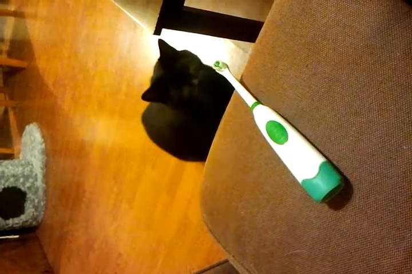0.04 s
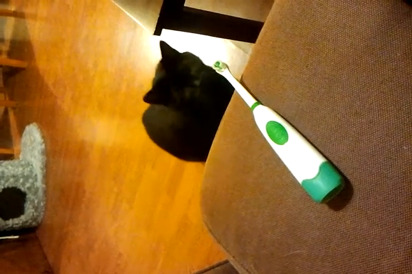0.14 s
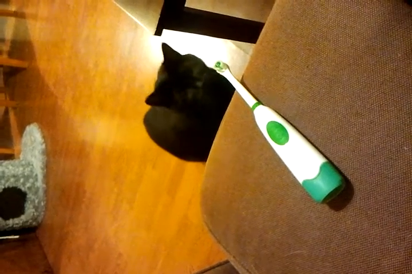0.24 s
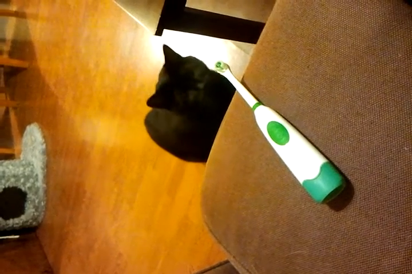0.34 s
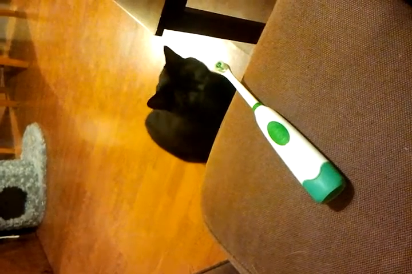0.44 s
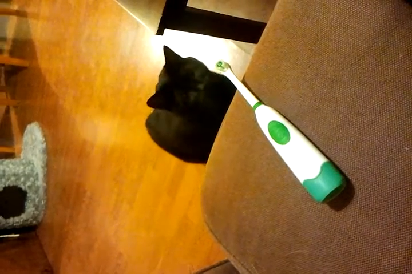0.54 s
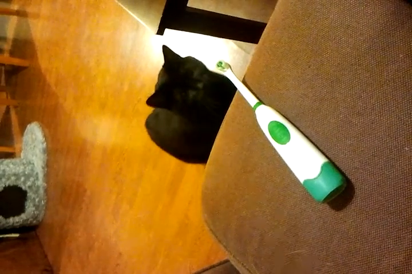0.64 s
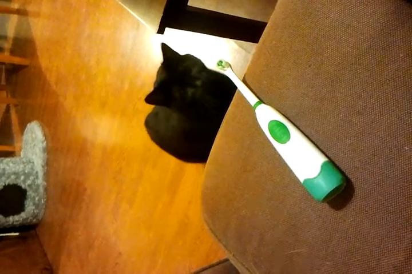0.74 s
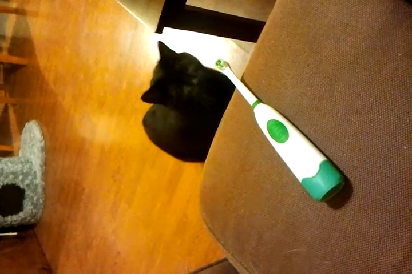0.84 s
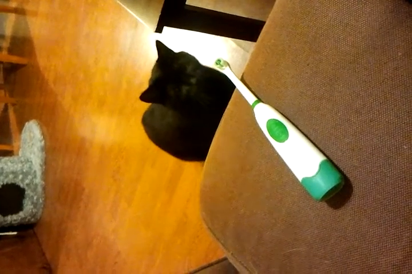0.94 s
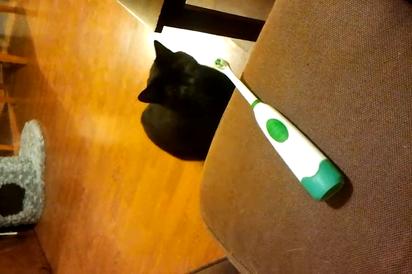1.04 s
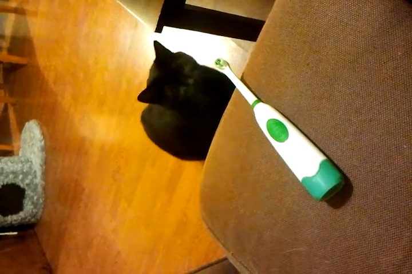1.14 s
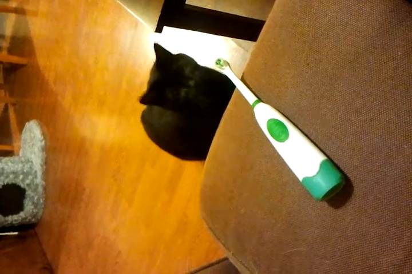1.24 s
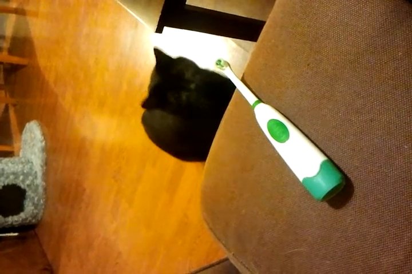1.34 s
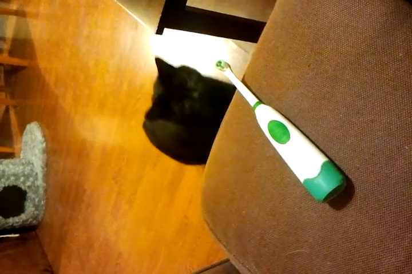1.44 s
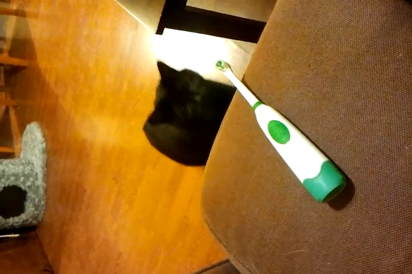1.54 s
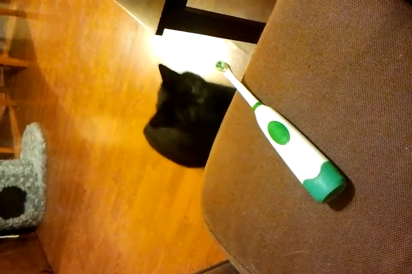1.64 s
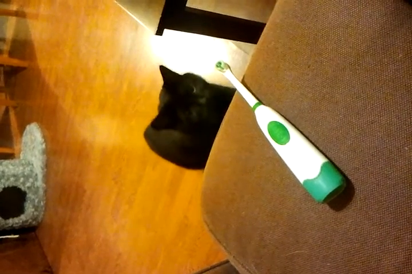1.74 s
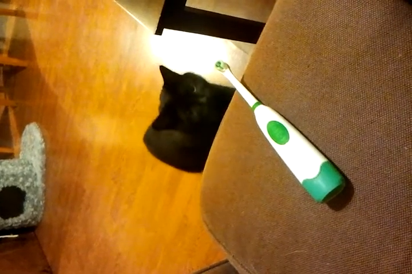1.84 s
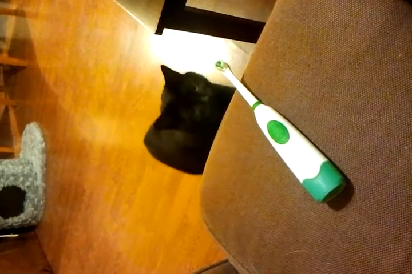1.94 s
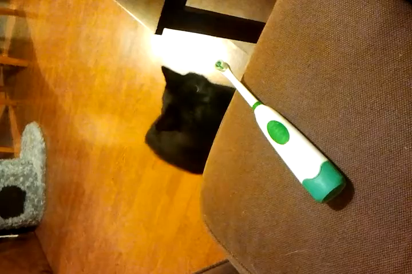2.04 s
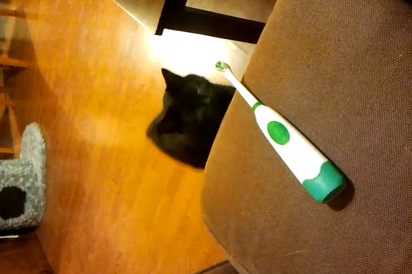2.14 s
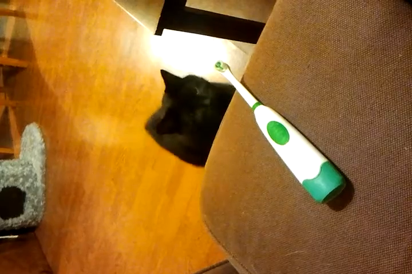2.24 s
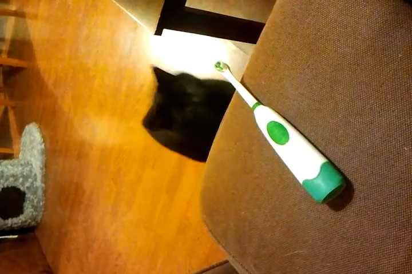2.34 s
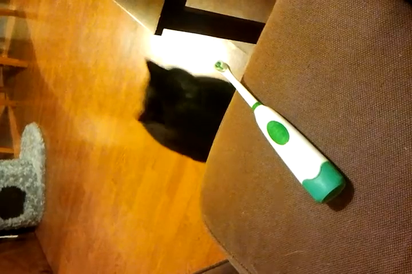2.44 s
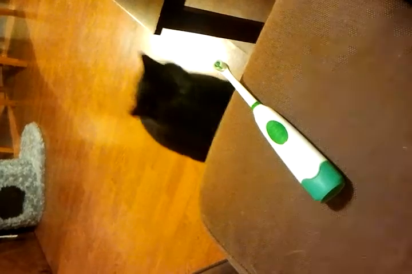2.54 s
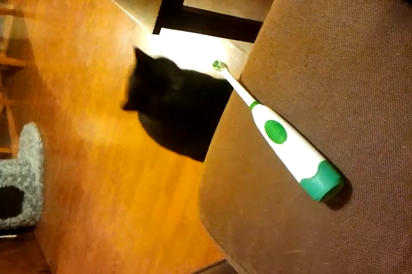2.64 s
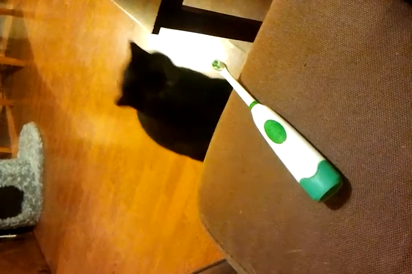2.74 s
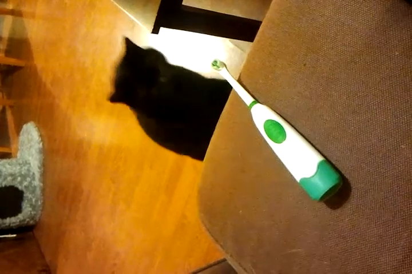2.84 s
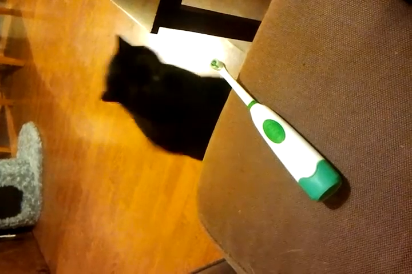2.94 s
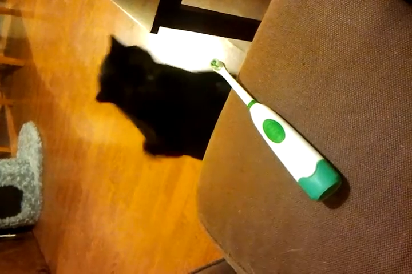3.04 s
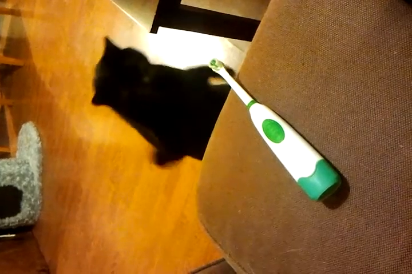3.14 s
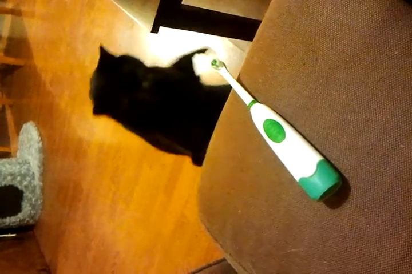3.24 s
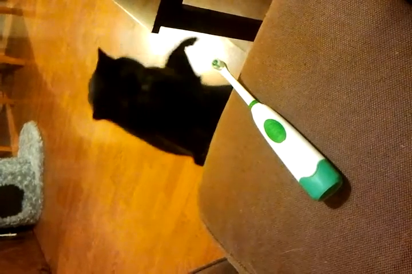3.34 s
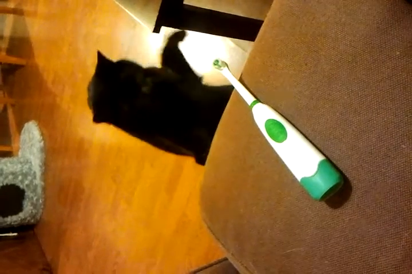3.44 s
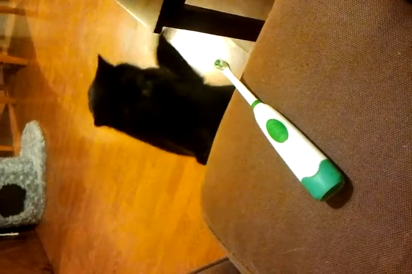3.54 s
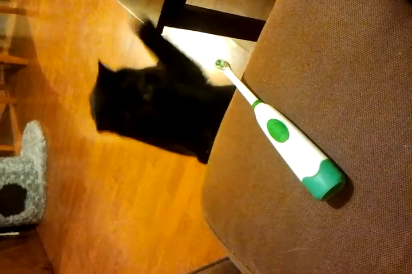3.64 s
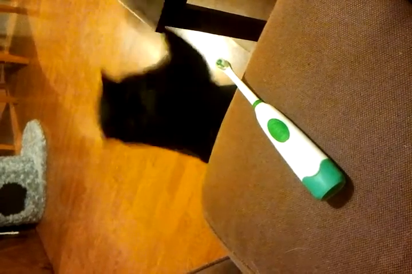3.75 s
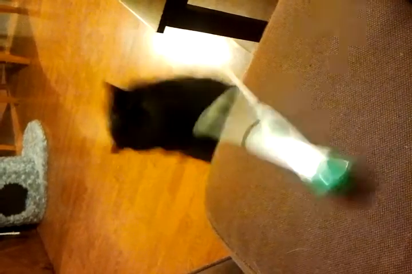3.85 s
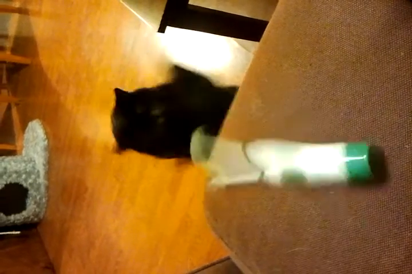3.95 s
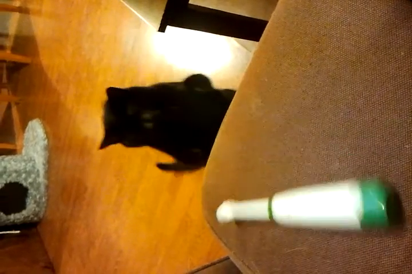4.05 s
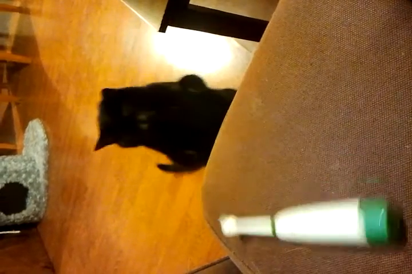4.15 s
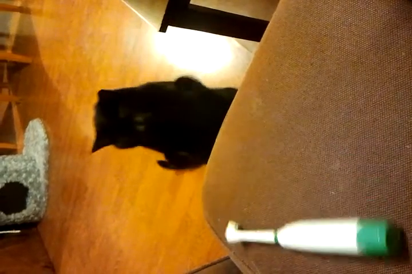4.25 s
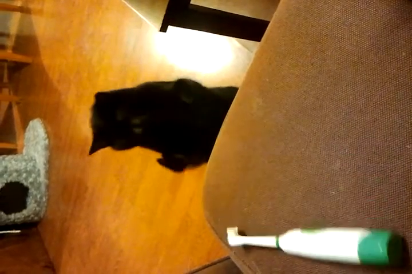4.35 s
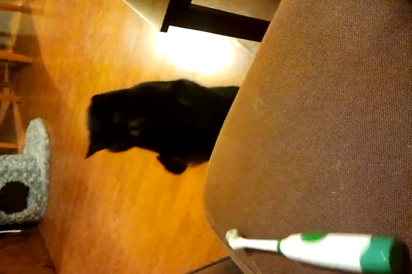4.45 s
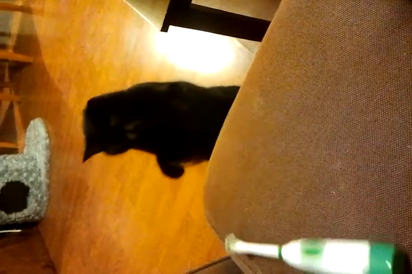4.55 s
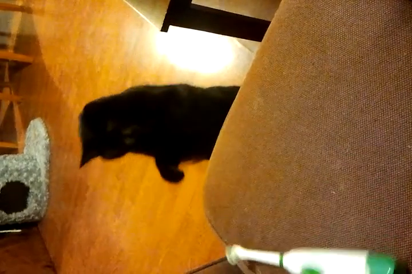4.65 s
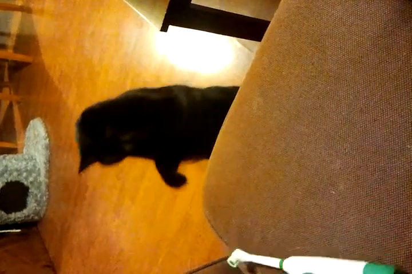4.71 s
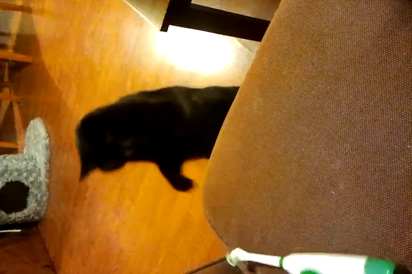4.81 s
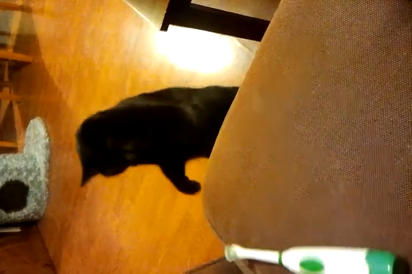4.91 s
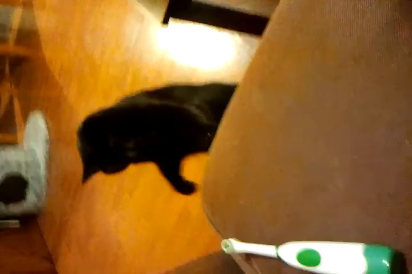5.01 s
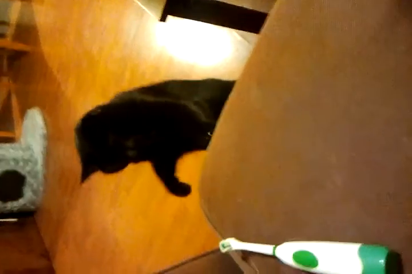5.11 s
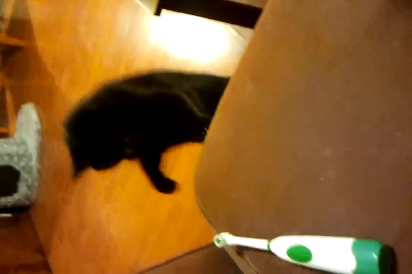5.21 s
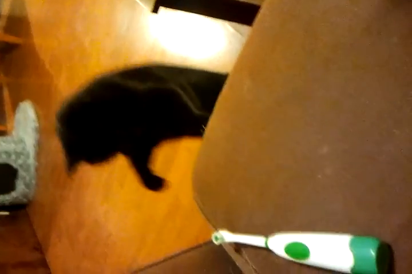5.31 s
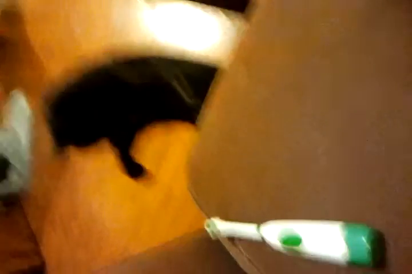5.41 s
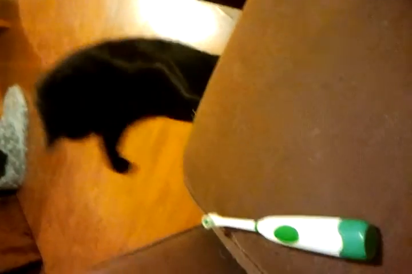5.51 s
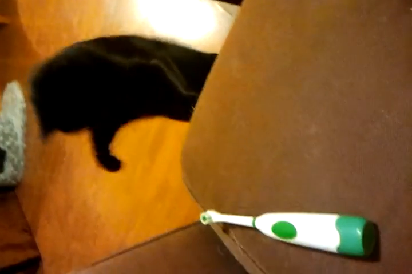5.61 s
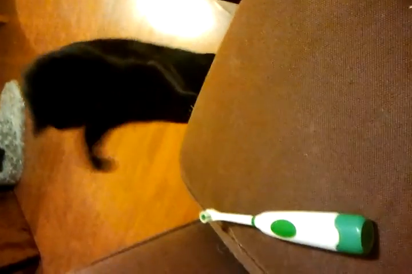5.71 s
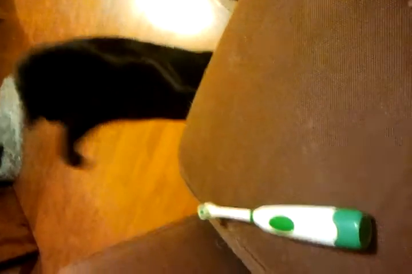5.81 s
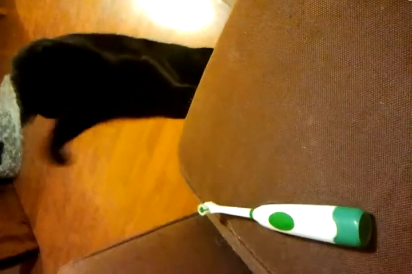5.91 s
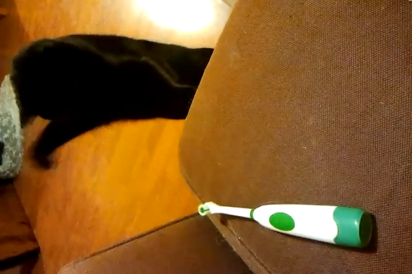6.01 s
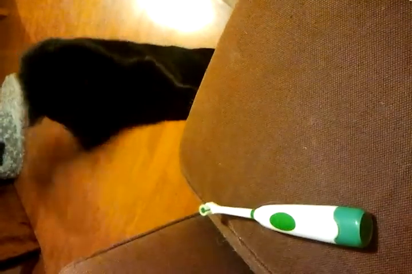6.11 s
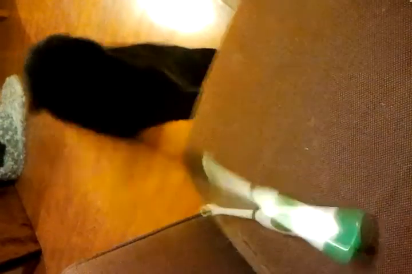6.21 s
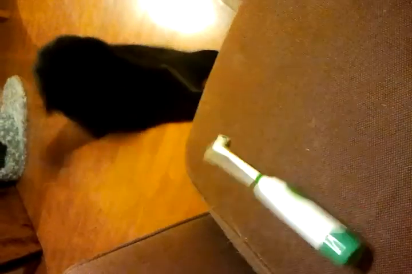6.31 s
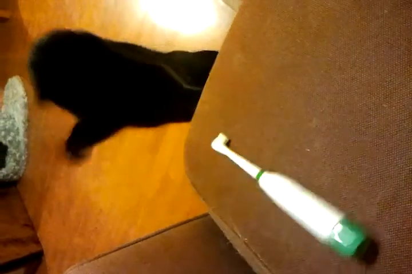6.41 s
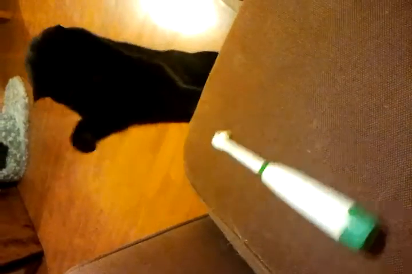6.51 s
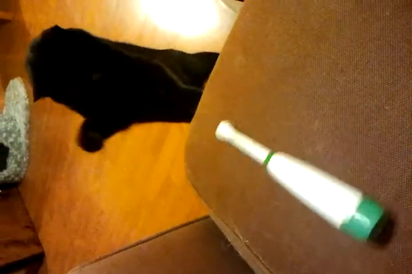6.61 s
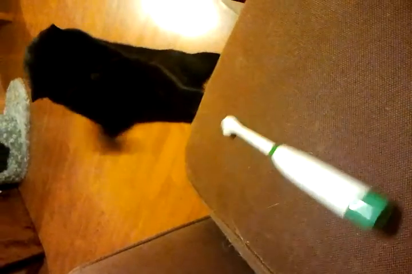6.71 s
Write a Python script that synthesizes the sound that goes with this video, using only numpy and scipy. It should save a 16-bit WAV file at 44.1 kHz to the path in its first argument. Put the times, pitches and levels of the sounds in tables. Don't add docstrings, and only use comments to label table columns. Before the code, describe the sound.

A battery toothbrush buzzes steadily on a padded seat until a cat's paw knocks it, and it rattles, settles, then is batted again.

```python
import sys
import numpy as np
from scipy import signal
from scipy.fft import rfft, irfft
from scipy.io import wavfile
from scipy.ndimage import uniform_filter1d

SR = 44100
rng = np.random.default_rng(int(sys.argv[2]) if len(sys.argv) > 2 else 0)


def to_linear_factor(level_db):
    exponent = np.asarray(level_db, float) / 20
    return 10 ** exponent


def file_out(sig):
    cols = np.atleast_2d(sig).T
    lim = np.clip(cols, -1, 1)
    pcm = np.round(lim * 32767).astype(np.int16)
    wavfile.write(sys.argv[1], SR, pcm)


N = 298557

# t/s, turns per s
SPEED = [(0.0, 95.2), (.09, 95.0), (1.07, 94.9), (1.23, 95.1), (1.39, 94.7), (1.86, 95.2), (1.95, 94.7),
         (2.31, 94.8), (2.44, 94.3), (2.66, 94.8), (2.85, 94.5), (2.93, 94.8), (3.49, 94.25), (3.65, 94.7),
         (3.75, 94.2),
         (3.9, 95.4), (4.25, 94.95), (4.55, 94.9), (4.7, 94.3), (4.8, 95.7), (5.05, 96.4),
                 (5.2, 95.2), (5.4, 94.75), (5.65, 94.5), (6.2, 94.4), (6.4, 94.6), (6.77, 95.6)]


def motor_turns():
    start_turn = .41
    return start_turn + np.cumsum(in_time(SPEED)[0]) / SR


# t/s, pose 0-3 (2 is rolling), looseness 0-1
POSE = [(0, 0, .1), (.4, 0, .1), (.52, 0, .24), (.62, 0, .1), (1.8, 0, .1), (2.08, 1, .1), (3.2, 1, .1),
        (3.3, 1, .2), (3.42, 1, .12), (3.56, 1, .2), (3.75, 1, .14), (3.77, 2, 1), (4.2, 2, .9),
        (4.3, 2, .55), (4.52, 2, .55), (4.64, 2, .75), (4.76, 2, .5), (5.0, 2, .4), (5.12, 3, .12),
        (6.2, 3, .08), (6.22, 2, 1), (6.5, 2, .9), (6.77, 2, .75)]


def lying(s=None):
    return in_time(POSE, s)


# share of turn, handle level/dB, neck level/dB, head level/dB
CONTACTS = [
    [(.05, 1.5, -6.5, -1.5), (.16, 0.5, -1.5, -15.5), (.3, 0.5, -10.5, -2.5), (.47, 7, -5.5, -7.5),
     (.6, -11, -10, -18.5), (.8, -13, -26, -5), (.92, -3, 3.5, 0)],
    [(.01, 2, -3.5, -7), (.11, -13, -20.5, 2.5), (.21, -9, -3.5, -24), (.34, -17, -9, -6),
     (.45, -6, -17, -2.5), (.74, 1.5, -16, -11.5), (.87, -4.5, 5, 2.5)],
    [(.12, -2, -4, -19), (.31, 0, 0, 0), (.44, -3, -3, -16), (.6, -2, -2, -13), (.74, -2, -3, -19),
     (.82, -2, -4, -18), (.89, -1, -2, -10)],
    [(.08, -5, -14.5, -19), (.21, -4, -25, 5), (.36, 3, 7.5, -18), (.51, 1, -16, -5), (.68, 0, -10, -4),
     (.89, -1.5, 10, 0), (.96, -0.5, -6, 4)],
]


def contact_blows(turns, slip=0.02836, scatter_db=1.5):
    wobble_turns = 0.0081
    jump_share = .45
    rebound_from, rebound_to, rebound_db = 4.7, 5.1, 8
    table = np.array(CONTACTS)
    turn = np.arange(660)
    t = np.arange(N) / SR
    pose, loose = lying(np.interp(turn, turns, t))
    share = np.clip(1 - np.abs(pose[:, None] - np.arange(4)), 0, 1)[:, :, None]
    loose = np.clip(loose, 0, 1)[:, None, None]
    shape = turn.shape + table.shape[:2]
    jump, lag = rng.standard_normal(shape), wander(shape, 6.0)
    place = turn[:, None, None] + table[..., 0]
    place = place + slip * loose ** 2 * (jump_share * jump + lag)
    place = place + wobble_turns * lag[:, :1, :1]
    s = np.interp(place, turns, t)
    blow = share * (place < turns[-1]) * to_linear_factor(scatter_db * loose * rng.standard_normal(shape))
    last = s[:, 2, -1]
    blow[:, 2, -1] *= to_linear_factor(rebound_db * (last > rebound_from) * (last < rebound_to))
    return s, blow, loose


# f/Hz, t60/s, then level/dB in each of the four poses
HANDLE = [(1322, 0.045, -10.5, -19, -17.5, -26), (1626, 0.024, -10.5, -2.5, -10, -16),
          (1813, 0.039, -10, -8.5, -7, -9.5), (2240, 0.022, -7.5, 3, -5.5, -0.5),
          (2510, 0.049, -3, -2.5, -1.5, -12), (2770, 0.013, -1, 4, 1, 6.5)]
# f/Hz, t60/s, then level/dB in each pose
NECK = [(3021, 0.031, -8, -11, -7.5, -14), (3190, 0.015, 0.5, 4, 1.5, -2.5), (3372, 0.018, -2, 1, 1, -2),
        (3684, 0.01, -12.5, -19, -1.5, 5), (4164, 0.03, -11.5, -15.5, -3.5, -11),
        (4465, 0.0088, -13.5, -11, -4, -3.5), (5180, 0.01, -13, -12.5, -4, -28)]
# f/Hz, t60/s, then level/dB in each pose
HEAD = [(5763, 0.016, -7, -9, -11.5, -6), (6183, 0.013, 2.5, -2.5, -2.5, 2), (6710, 0.0073, 5, -1, 1.5, 0),
        (7124, 0.013, 0, -1, 0.5, -6), (7570, 0.012, -9, -4.5, -3, -5.5),
        (8050, 0.011, -10.5, -24, -9.5, -14), (8540, 0.011, -30, -13, -10.5, -11.5)]
# handle, neck, head level/dB
HAMMER_DB = (-6, -7, -12)
SPOT_SHARE = [
    [1],
    [1],
    [.3],
    [1],
]
SIDE_S = (3.95, 4.4, 4.85, 6.35, 6.65)
# level/dB of every tone of handle, neck, head
SIDE_DB = [
    [(3, -1, -4, -4, 2.5, 3), (1, -1, -1, 1, -1, -1, -1), (-2, -1.5, 0.5, 2, 1, -1.5, -2)],
    [(-1.8, -2, -0.14, -0.15, 0.53, 1), (0.65, -1.1, -0.78, 1, 2, 0.6, -0.82),
     (-1.2, -0.13, 1, -0.34, -1.5, -0.72, 1)],
    [(-4.5, -7, -1.5, 2, -2.5, 1.5), (1, 1, -1, -1, 0.77, 0.61, -2), (0, 3, 0.5, 4, 2.5, 4, 1.5)],
    [(-1, 0, -6, 7, 3, -2), (11, 0, 3, -6, -0.5, -6, 0), (-0.68, 1, 0.41, 1, -2, 0.2, 0.87)],
    [(9, -8, -4.5, -3, -1, -14), (6, 0, -1, 3, -5, -6, -2), (8, 3, 3.5, 4.5, 7, 7, -10)],
]
SOUNDS_ABOVE_HZ = (700, 1800, 5400)


def shell(turns, creep_db=4.5, spot_db=2.0, rub_db=-41):
    chatter_db, chatter_rise_db = -45.5, 42
    roll_damping, roll_t60_s = .66, 0.011
    roll_colour_db, loose_spot_db = 1.5, 3.5
    t, turn, table = np.arange(N) / SR, np.arange(660), np.array(CONTACTS)
    s, blow, loose_per_turn = contact_blows(turns)
    shaky = loose_spot_db * loose_per_turn ** 2
    pose, loose = lying()
    hammering = 4 * loose * (1 - loose)
    rolling = np.clip(1 - np.abs(pose - 2), 0, 1)
    stray = (rng.random(N) < 1500.0 / SR) * rng.standard_normal(N)
    stray = stray * to_linear_factor(chatter_db + chatter_rise_db * loose)
    out = 0
    for part, (modes, level_db) in enumerate(zip((HANDLE, NECK, HEAD), shell_level())):
        sound = 0
        for k, (hz, t60, *pose_db) in enumerate(modes):
            spot = spot_db * rng.standard_normal(blow.shape[1:])
            creep = wander(blow.shape, 29.0)
            roll_db = roll_colour_db * loose * np.interp(turns, turn, creep[:, 2, 0])
            side_db = np.interp(t, SIDE_S, [side[part][k] for side in SIDE_DB])
            spot_gain = to_linear_factor(spot * SPOT_SHARE + creep_db * creep + shaky * rng.standard_normal(blow.shape))
            sizes = blow * spot_gain * to_linear_factor(table[..., part + 1] + np.array(pose_db)[:, None])
            unsteady = stray + to_linear_factor(rub_db) * rng.standard_normal(N)
            unsteady *= to_linear_factor(np.interp(pose, np.arange(4), pose_db) + HAMMER_DB[part] * hammering)
            drive = to_linear_factor(roll_db) * (clicks_at(s, sizes) + unsteady)
            free = ring((1 - rolling) * drive, hz, t60)
            rubbed = ring(rolling * to_linear_factor(side_db) * drive, hz, min(roll_damping * t60, roll_t60_s))
            sound = sound + (-1) ** k * (free + rubbed)
        high_pass = signal.butter(3, SOUNDS_ABOVE_HZ[part], "high", fs=SR, output="sos")
        sound = signal.sosfilt(high_pass, sound)
        out = out + to_linear_factor(level_db) * sound / np.sqrt(uniform_filter1d(sound ** 2, size=1864))
    return out


# handle, neck, head level/dB
SHELL_DB = [(-59.5, -57, -58.5), (-60.5, -56, -59.5), (-58.5, -59, -58.5), (-61.5, -59, -53.5)]
# t/s of peak, half length/s, head gain level/dB
HEAD_SWELLS = [(3.924, 0.031, 5), (4.008, 0.017, 3), (4.114, 0.11, 6.5), (4.324, 0.13, 10), (4.462, 0.32, 12.5),
               (4.86, 0.25, 13), (4.966, 0.18, 12), (6.258, 0.081, 7), (6.565, 0.035, 5.5), (6.632, 0.015, -1),
               (6.732, 0.036, 4.5)]
SWELL_SHARE = (0.066, 0.15, 1)


def shell_level():
    t = np.arange(N) / SR
    presses = [db * np.clip(1 - np.abs(t - s) / half, 0, 1) for s, half, db in HEAD_SWELLS]
    return in_pose(SHELL_DB) + np.array(SWELL_SHARE)[:, None] * np.max(presses, axis=0)


# multiple of the turn rate, level/dB
ORDER_DB = [
    [(1, 0), (2, -19.5), (3, -26), (4, -13), (5, -9), (6, -20), (7, -30.5), (8, -43), (9, -18), (10, -15.5),
     (11, -31), (12, -38.5), (13, -31)],
    [(1, 0), (2, -22.5), (3, -23), (4, -12.5), (5, -11.5), (6, -14), (7, -41.5), (8, -43), (9, -17),
     (10, -13.5), (11, -20), (12, -20), (13, -20.5)],
    [(1, 0), (2, -2.5), (3, -5), (4, -8), (5, -9.5), (6, -18.5), (7, -17.5), (8, -33), (9, -10), (10, -8.5),
     (11, -15.5), (12, -7), (13, -13)],
    [(1, 0), (2, -8), (3, -13.5), (4, -6), (5, -9.5), (6, -29), (7, -22), (8, -27), (9, -13), (10, -20.5),
     (11, -22.5), (12, -12), (13, -27.5)],
]
# first multiple level/dB, higher multiples level/dB
HUM_DB = [(-56.5, -60.5), (-57, -61.5), (-66, -70.5), (-64.5, -68.5)]
# first multiple level/dB, higher multiples level/dB
LIFT_LOSS_DB = (-16, -3.5)


def hum(turns):
    pose, loose = lying()
    first_db, higher_db = in_pose(HUM_DB) + np.array(LIFT_LOSS_DB)[:, None] * loose
    out = -to_linear_factor(first_db) * np.cos(2 * np.pi * turns)
    for k, pose_db in enumerate(np.array(ORDER_DB)[:, 1:, 1].T):
        level_db = higher_db + np.interp(pose, np.arange(4), pose_db)
        tone = np.sin(2 * np.pi * ((k + 2) * turns + rng.random()))
        out += to_linear_factor(level_db + 2.77 * sway(1.0)) * tone
    return np.sqrt(2) * out


# t/s, peak level/dB, f/Hz, t60/s, seat boom level/dB
THUMPS = [(2.405, -37, 370, 0.031, -25), (2.406, -41.5, 874, 0.031, -41), (2.437, -47, 600, 0.0076, -36),
          (2.458, -49, 400, 0.028, -34), (2.472, -50, 298, 0.031, -19), (2.473, -46.5, 955, 0.018, -33),
          (3.544, -42.5, 513, 0.022, -25), (3.545, -37, 1310, 0.0041, -41), (3.544, -43, 1940, 0.0067, -39),
          (3.761, -31.5, 950, 0.0044, -16), (3.784, -34.5, 269, 0.041, -15),
          (3.888, -21.5, 460, 0.016, -29), (3.888, -37.5, 1300, 0.0092, -24), (3.917, -42, 393, 0.031, -19),
          (6.2125, -50, 119.9, 0.011, -20), (6.215, -23.5, 262, 0.021, -8), (6.219, -22, 313, 0.021, -7.5),
          (6.2199, -28.5, 553, 0.036, -36), (6.228, -36, 240, 0.099, -29), (6.261, -40, 202, 0.057, -19),
          (6.436, -58, 304, 0.044, -8)]
# f/Hz, level/dB, t60/s
SEAT = [(32.2, -17.5, 0.85), (103.7, 2.5, 0.19), (173.5, -14, 0.38)]


def thumps():
    s, peak_db, _, _, boom_db = np.transpose(THUMPS)
    out = sum(ring(clicks_at(s, to_linear_factor(peak_db + boom_db + db)), hz, t60) for hz, db, t60 in SEAT)
    for at, db, hz, t60, _ in THUMPS:
        soft = signal.butter(1, 3.7 * hz, fs=SR)
        out -= to_linear_factor(db + 3.0) * signal.lfilter(*soft, ring(clicks_at(at, 0.77), hz, t60))
    return out


# t/s, head level/dB, neck level/dB, handle level/dB
CRACKS = [(2.405, -53, -49, -46), (3.903, -41, -50, -58), (3.915, -47, -53, -58), (3.92, -44, -55, -58),
          (3.926, -43, -56, -58), (3.977, -44, -56, -56), (4.005, -40, -58, -58), (4.010, -39, -58, -58),
          (4.016, -45, -58, -56), (4.303, -39, -61, -58), (4.364, -33, -58, -58), (4.6828, -44, -58, -60),
          (6.624, -41, -64, -60), (6.715, -44, -60, -60), (3.999, -45, -56, -58), (4.087, -44, -58, -55),
          (4.535, -35, -52, -58), (4.5456, -37, -55, -60), (4.621, -37, -58, -58), (4.7044, -42, -59, -58),
          (4.7093, -37, -59, -59), (6.428, -54, -63, -60), (6.4963, -46, -63, -55), (6.704, -49, -52, -60),
          (6.7354, -41, -51, -56), (4.108, -42, -57, -60), (4.4608, -32, -56, -59), (4.481, -33, -47, -57),
          (6.6132, -43, -53, -54), (6.6457, -40, -58, -58), (4.573, -32, -54, -59), (3.544, -51, -52, -39),
          (3.7617, -22.5, -28.5, -34), (3.7665, -38, -38, -50), (3.766, -37, -55, -50),
          (3.779, -28.5, -40, -41), (3.788, -30, -33, -43), (3.7944, -31, -42, -45),
          (3.957, -37.5, -53, -55), (6.211, -18, -37, -31), (6.218, -27, -30, -37), (6.221, -22, -32, -30),
          (6.224, -32, -46, -43.5), (6.232, -37, -38, -38), (6.264, -42, -43, -39)]


def cracks():
    longest_s = .016
    s, *part_db = np.transpose(CRACKS)
    out = 0
    for modes, level_db in zip((HEAD, NECK, HANDLE), part_db):
        chance = rng.standard_normal((len(s), len(modes)))
        for k, (hz, t60, _, _, rolling_db, _) in enumerate(modes):
            sizes = to_linear_factor(level_db + rolling_db - 6.5 + 3.4 * chance[:, k])
            out = out + (-1) ** k * ring(clicks_at(s, sizes), hz, min(t60, longest_s))
    return out


# t/s, peak level/dB, t60/s
SCUFF = [
    (3.779, -43.5, 0.26),
    (3.897, -51, 0.69),
    (4.35, -72, 0.79),
    (5.002, -75.5, 3.9),
    (6.227, -51, 1.16),
    (6.55, -63, 2.3),
]
# f/Hz, level/dB per Hz
SCUFF_COLOUR = [(12, -17), (31, 0), (60, -12), (140, -10.5), (250, -10.5), (480, -6), (700, -20),
                (1500, -19), (3000, -30.5), (20000, -89)]


def scuff():
    t = np.arange(N) / SR
    level = 0
    for s, db, t60 in SCUFF:
        away = np.where(t > s, t - s, (s - t) / 0.1)
        level = level + to_linear_factor(db - 60 / t60 * away)
    return level * to_linear_factor(4.2 * sway(36.0)) * coloured(SCUFF_COLOUR)


# t/s, f/Hz, level/dB
DRONE = [(0, 136.6, -61.5), (.5, 125.6, -76), (.6, 131.4, -68), (2.1, 134, -68.5), (2.4, 132.7, -81.5),
         (5.0, 134.2, -77), (6.2, 129.9, -77.5), (6.5, 146, -65.5), (6.77, 134, -74)]


def drone():
    hz, level_db = in_time(DRONE)
    return np.sqrt(2) * to_linear_factor(level_db + 3.3 * sway(1.1)) * np.sin(2 * np.pi * np.cumsum(hz) / SR)


# f/Hz, level/dB per Hz
ROOM = [(12, -10), (31, -10.5), (50, -16.5), (80, -9.5), (160, -17.5), (300, -20.5), (500, -22.5),
        (700, -26.5), (1200, -26.5), (1900, -33), (3000, -29), (5000, -34), (8000, -27), (20000, -69.5)]


def room():
    return to_linear_factor(-66.5) * coloured(ROOM)


def rms_one(x):
    return x / np.sqrt(np.mean(x ** 2) + 1e-20)


def in_time(rows, s=None):
    at, *columns = np.transpose(rows)
    when = np.arange(N) / SR if s is None else s
    return [np.interp(when, at, c) for c in columns]


def in_pose(table):
    pose = lying()[0]
    return np.array([np.interp(pose, np.arange(4), c) for c in np.transpose(table)])


def ring(clicks, hz, t60):
    r, w = to_linear_factor(-60 / (t60 * SR)), 2 * np.pi * hz / SR
    return signal.lfilter([0, np.sin(w)], [1, -2 * r * np.cos(w), r * r], clicks + 1e-18)


def clicks_at(s, sizes):
    at = np.clip(np.ravel(s) * SR, 0, N - 2)
    whole, sizes = at.astype(int), np.ravel(sizes)
    early = np.bincount(whole, sizes * (1 + whole - at), N)
    return early + np.bincount(whole + 1, sizes * (at - whole), N)


def wander(shape, steps):
    r = np.exp(-1 / steps)
    white = rng.standard_normal((shape[0] + 400,) + shape[1:])
    return rms_one(signal.lfilter([1], [1, -2 * r, r * r], white, axis=0)[400:])


def sway(per_s):
    return np.repeat(wander((N // 100 + 1,), SR / 100 / per_s), 100)[:N]


def coloured(spectrum):
    hz, level_db = np.transpose(spectrum)
    grid = np.fft.rfftfreq(N, 1 / SR) + 1
    gain = to_linear_factor(np.interp(np.log(grid), np.log(hz), level_db))
    return rms_one(irfft(rfft(rng.standard_normal(N)) * gain, N))


def scene():
    turns = motor_turns()
    near = shell(turns) + hum(turns) + thumps() + cracks() + scuff()
    return (near + drone() + room())[None]


def roll_off(x):
    return signal.sosfilt(signal.butter(12, 9280, fs=SR, output="sos"), x)


def record(dry):
    steep = signal.cheby2(10, 50, 9600, fs=SR, output="sos")
    mix = signal.sosfilt(steep, dry)
    return roll_off(mix)


dry = scene()
out = record(dry)
file_out(out)
```